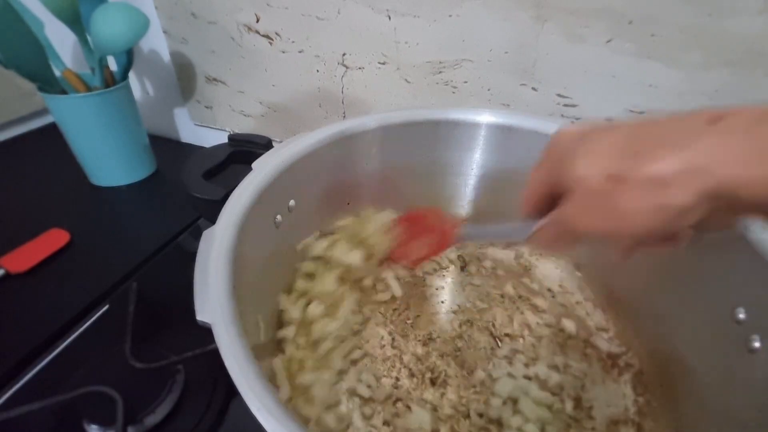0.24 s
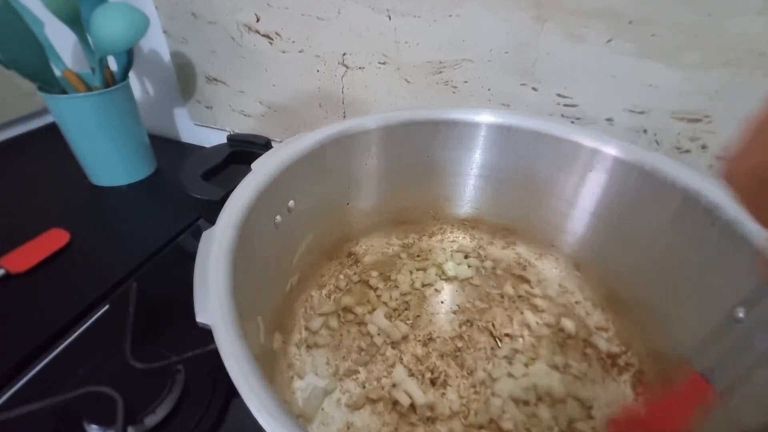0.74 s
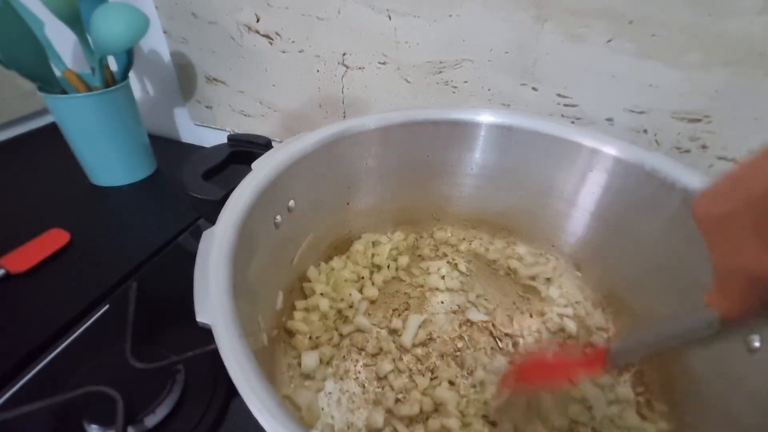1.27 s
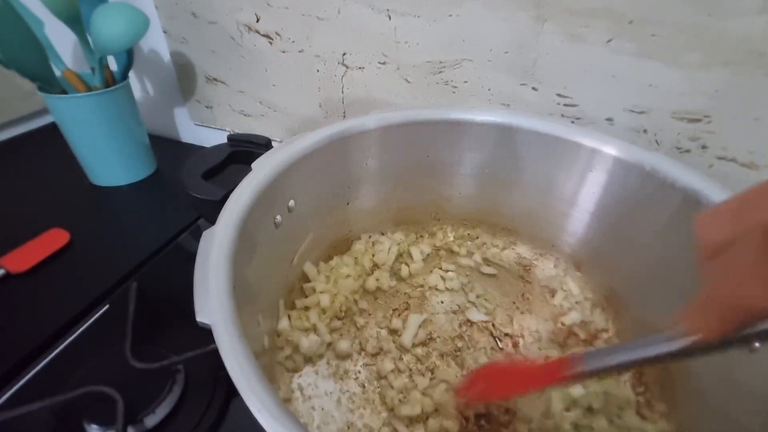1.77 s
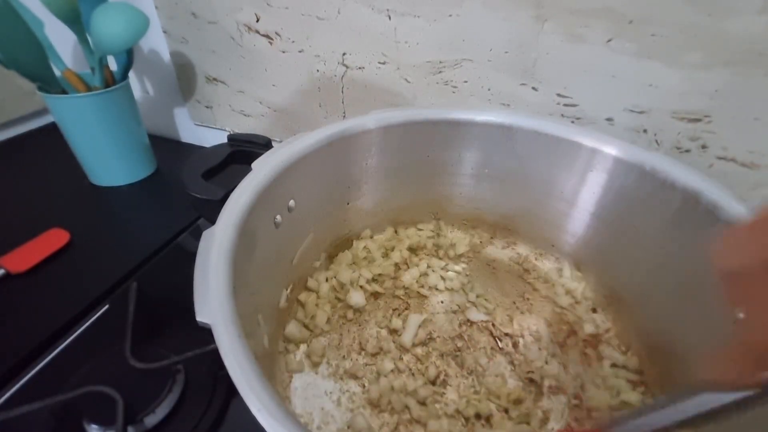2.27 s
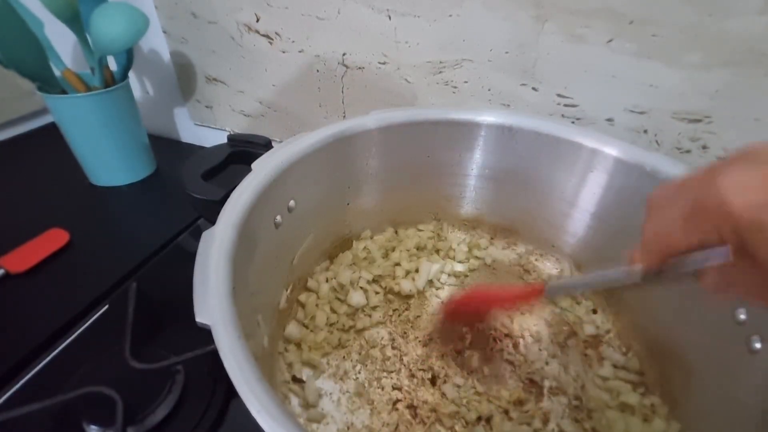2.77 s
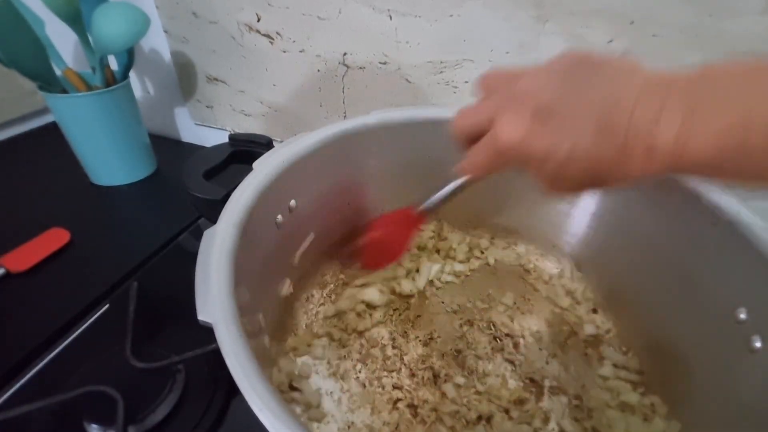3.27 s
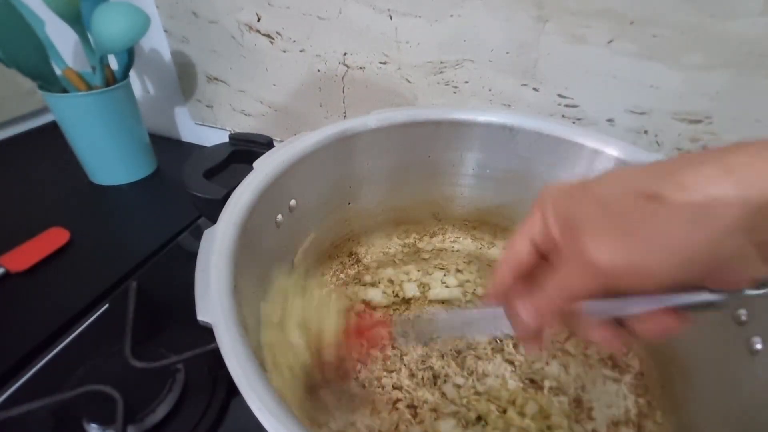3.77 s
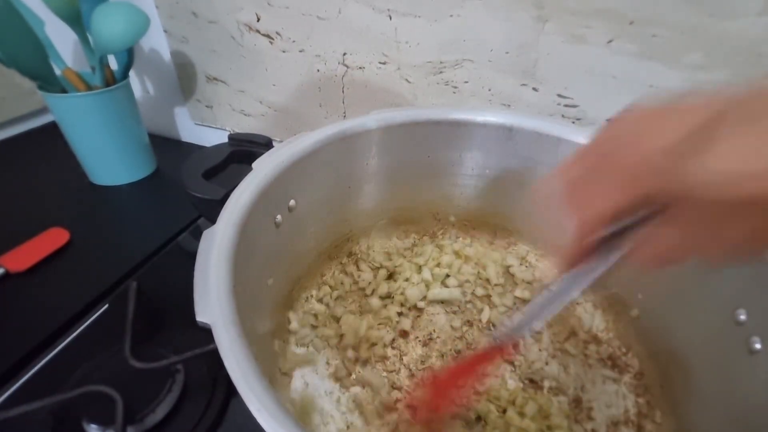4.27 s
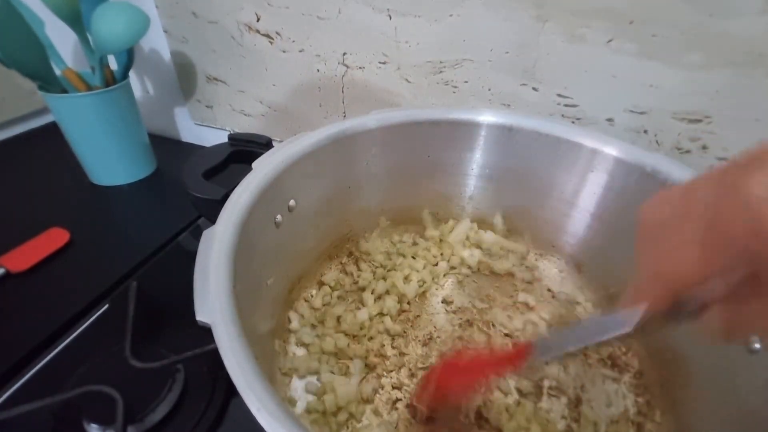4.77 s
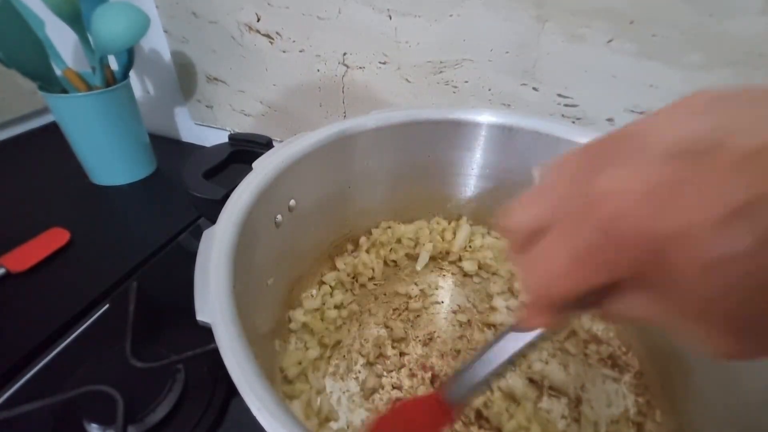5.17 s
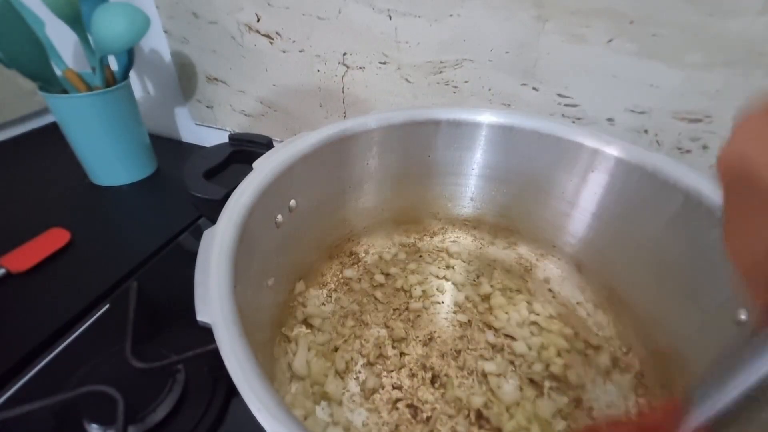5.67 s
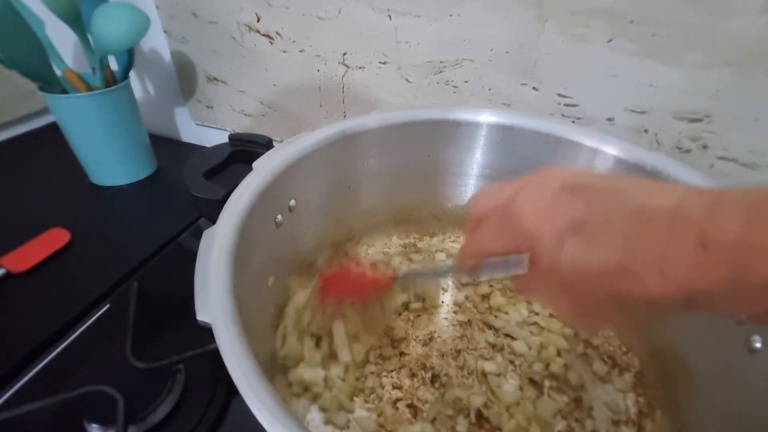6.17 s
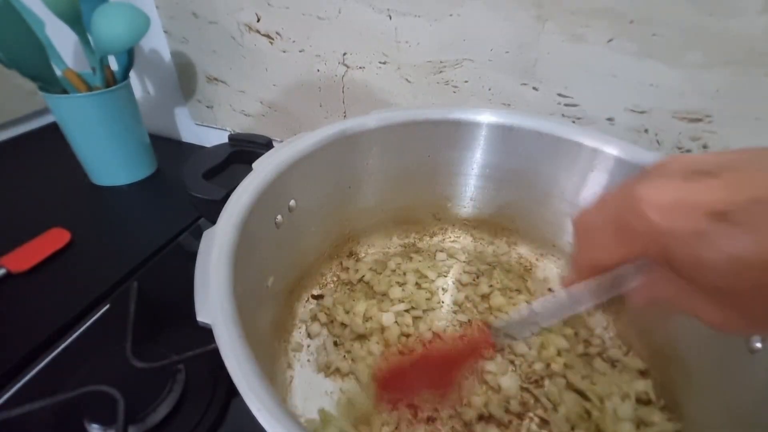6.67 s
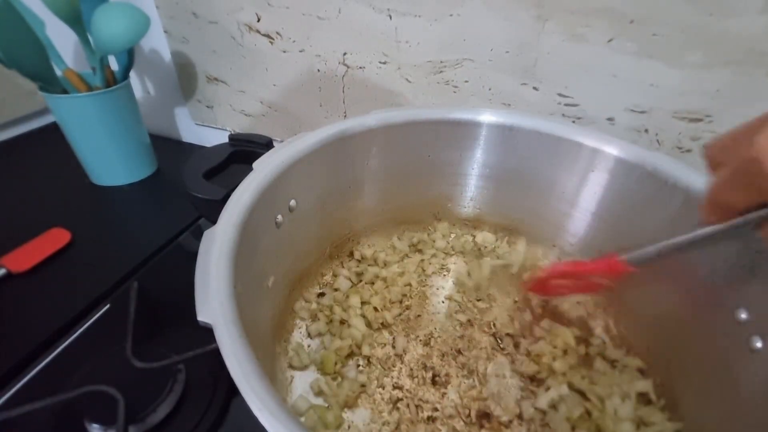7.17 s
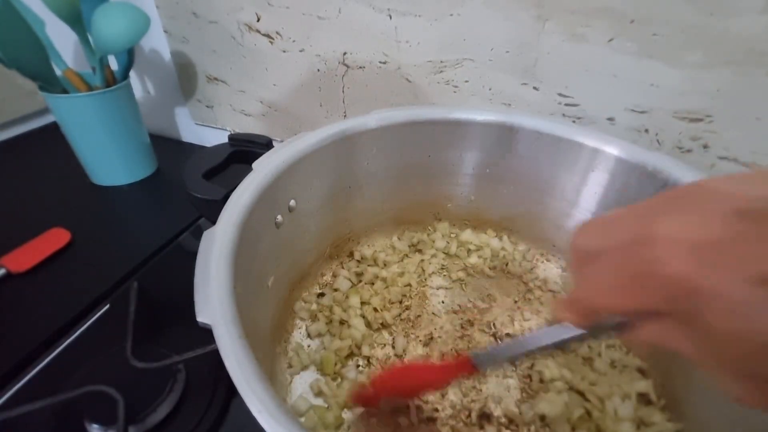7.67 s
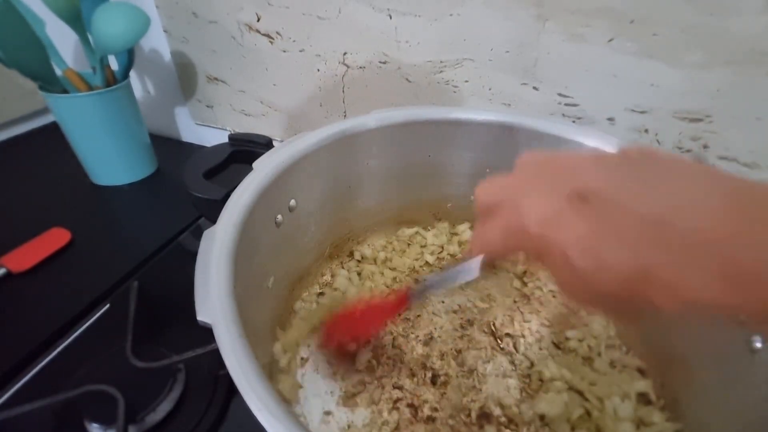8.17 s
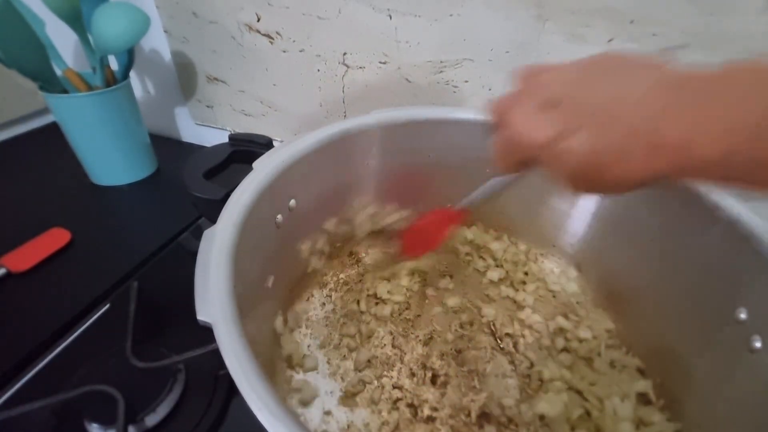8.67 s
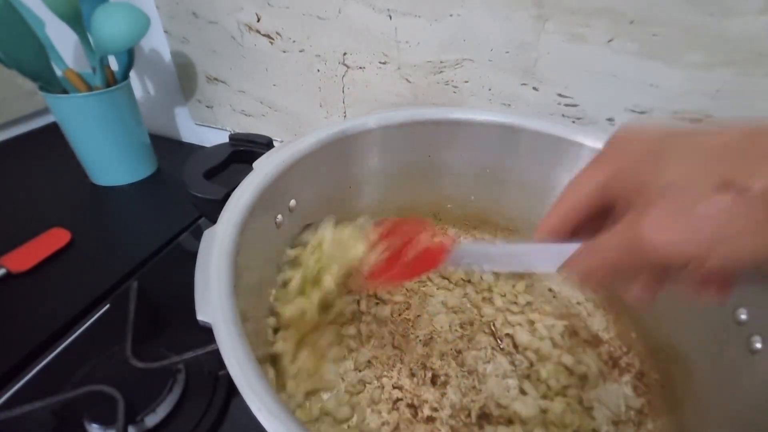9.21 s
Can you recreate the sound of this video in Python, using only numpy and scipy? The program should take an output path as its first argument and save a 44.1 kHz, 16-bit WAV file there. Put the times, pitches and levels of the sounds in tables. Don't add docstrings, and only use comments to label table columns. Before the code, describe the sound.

From the first moment a dense, bright sizzle of onion and garlic in hot oil fills the close stereo view, continuing to the end at about 9.4 s. Quick stirring makes it swell and settle two to five times a second, with a strong flare near 0.35 s. Light scraping starts quietly; soft hollow pushes on the pot bottom gather around 2.4-3.0 s. At about 4.6 s comes the sharpest oil spit, together with a firm low metallic bump and ticks, more bumps following until 4.9 s. Two small wall knocks ring near 5.4 s. A cluster of spits and knocks comes at 6.8 s, then pushes repeat from 7.0 to 8.1 s. Paired spits snap near 8.75 s and a faint one at 9.3 s. Throughout, the pot rocks dully, worktop bumps are faint, and distant low rumble swells softly, strongest around 2.7-3.6 s.

```python
import sys
import numpy as np
from scipy import signal
from scipy.fft import rfft, irfft, next_fast_len
from scipy.io import wavfile
from scipy.ndimage import uniform_filter1d, map_coordinates

SR = 44100
rng = np.random.default_rng(int(sys.argv[2]) if len(sys.argv) > 2 else 0)


def int16_out(signal):
    q = np.round(np.clip(np.atleast_2d(signal).T, -1, 1) * 32767)
    wavfile.write(sys.argv[1], SR, q.astype(np.int16))


def voltage_ratio(decibels):
    exponent = np.asarray(decibels, float) / 20
    return 10 ** exponent


N = 416304

# peak in seconds, fizz in dB, big bubbles in dB,
# seconds to fade 6 dB.
STROKES = [(0.0, -31.0, -40.5, 0.08), (0.13, -28.0, -41.5, 0.05), (0.35, -22.5, -39.0, 0.19),
           (0.57, -34.5, -41.5, 0.06), (0.74, -31.5, -47.0, 0.5), (0.93, -35.5, -49.0, 0.5),
           (1.17, -26.5, -44.0, 0.21), (1.35, -32.0, -44.5, 0.05), (1.51, -32.0, -49.0, 0.5),
           (1.69, -27.5, -46.0, 0.24), (2.01, -30.0, -44.0, 0.39), (2.16, -25.5, -48.5, 0.09),
           (2.27, -29.0, -44.5, 0.3), (2.49, -28.5, -46.5, 0.13), (2.62, -29.0, -46.0, 0.5),
           (2.9, -29.5, -60.0, 0.11), (3.11, -30.5, -53.5, 0.32), (3.38, -25.0, -39.5, 0.18),
           (3.59, -29.0, -39.0, 0.12), (3.78, -31.0, -52.5, 0.5), (4.05, -25.0, -40.0, 0.31),
           (4.33, -29.5, -60.0, 0.43), (4.54, -33.5, -42.5, 0.5), (4.71, -27.0, -45.5, 0.19),
           (5.02, -27.5, -42.0, 0.16), (5.13, -27.5, -45.5, 0.49), (5.47, -27.5, -38.5, 0.18),
           (5.74, -36.5, -47.0, 0.16), (6.04, -28.5, -43.0, 0.26), (6.23, -31.5, -41.5, 0.1),
           (6.38, -31.5, -50.0, 0.5), (6.83, -27.0, -41.5, 0.43), (7.16, -31.5, -48.0, 0.12),
           (7.28, -28.5, -46.5, 0.07), (7.43, -32.0, -44.0, 0.05), (7.52, -28.5, -45.5, 0.24),
           (7.88, -26.5, -42.5, 0.16), (8.08, -30.0, -52.0, 0.23), (8.29, -28.0, -43.5, 0.19),
           (8.48, -29.0, -47.5, 0.5), (8.75, -26.5, -40.5, 0.16), (8.97, -34.0, -42.5, 0.15),
           (9.35, -27.5, -44.0, 0.5)]


def stirring():
    rest_fizz_db, rest_medium_db, rest_big_db = -33.4, -39.2, -45
    flare_s, shape = .111, 1.7
    fizz_rows = [(s, db, flare_s, fade_s) for s, db, _, fade_s in STROKES]
    big_rows = [(s, db, flare_s, fade_s) for s, _, db, fade_s in STROKES]
    fizz_db = surges(fizz_rows, rest_fizz_db, shape)
    big_db = surges(big_rows, rest_big_db, shape)
    medium_db = rest_medium_db + .78 * (fizz_db - rest_fizz_db) + .3 * (big_db - rest_big_db)
    return fizz_db, medium_db, big_db


# frequency in Hz, level in dB per Hz.
BURST_COLOUR = [
    [(700, -33), (1100, -24), (1320, -12.5), (1700, -12.5), (2500, -10.5), (3200, -8), (5300, -3), (6200, -0.5), (7300, 1), (8300, -1.5), (9200, -8), (11000, -2), (12300, -1), (17500, -4)],
    [(700, -35), (1100, -27), (1320, -12.5), (2000, -10), (3200, -6), (5300, 1), (6200, 1.5), (7700, 9.5), (8700, 3), (10700, 3.4), (11800, -1), (13200, 6.9), (17500, 1.5)],
]
# time in seconds, left-right level in dB.
HEAP_PAN = [(0.0, -5.5), (0.31, -8.5), (0.5, -6.0), (1.1, -6.5), (1.52, -3.5), (1.6, -5.5), (2.87, -4.5),
            (3.05, -2.5), (3.29, -5.5), (3.6, -3.5), (4.05, -7.0), (4.57, -3.5), (6.15, -6.5), (8.04, -4.0),
            (8.23, -5.5), (9.44, -6.0)]


def frying():
    fizz_db, medium_db, big_db = stirring()
    pan_db = curves(HEAP_PAN)[0]
    low_hz, high_hz = 3200, 6500
    oil = bursts(30000, 1.3, life_s=.0008) + voltage_ratio(-13) * bursts(250, 1.5, life_s=.0001)
    oil = alike(patchy(oil, depth_db=1.14))
    smother_db = -4 * np.exp(-((np.arange(N) / SR - 1.537) / .012) ** 2)
    oil = oil * voltage_ratio(0.35 * wobble(18) + smother_db)

    def colour(hz):
        return voltage_ratio([along(port, hz) for port in BURST_COLOUR])

    def under(hz, edge_hz):
        return 1 / (1 + (hz / edge_hz) ** 6)

    small = unit(filtered(oil, lambda hz: colour(hz) * (1 - under(hz, high_hz))))
    medium = unit(filtered(oil, lambda hz: colour(hz) * (under(hz, high_hz) - under(hz, low_hz))))
    big = unit(filtered(oil, lambda hz: colour(hz) * under(hz, low_hz)))
    fine = signal.filtfilt(*signal.butter(N=3, Wn=9000 / SR * 2, btype="high"), small)
    small = small + (voltage_ratio((.66 - 1) * (fizz_db - fizz_db.mean())) - 1) * fine
    haze = voltage_ratio(fizz_db) * small + voltage_ratio(medium_db) * medium + voltage_ratio(big_db - 3.2) * big
    return voltage_ratio(2.55) * haze * sides(pan_db - pan_db.mean())


# start in seconds, peak in dB.
SPITS = [
    (4.564, -10),
    (6.7694, -18),
    (6.8688, -16),
    (1.5574, -21),
    (7.12, -19),
    (8.742, -15),
    (8.803, -15),
    (3.237, -19),
    (6.8203, -19),
    (9.3062, -20),
]


def spits():
    drops = scuffs([(s, db + 4) for s, db in SPITS], t60_s=.006)
    return filtered(drops, modes([(5000, 5000, 0)]))


# time in seconds, on the bottom in dB, on the wall in dB.
RUB = [(0, -55, -58), (1.0, -57, -56), (1.3, -52, -55), (1.65, -57, -54), (2.3, -55, -55), (2.55, -48, -56),
       (3.15, -57, -61), (3.5, -53, -57), (3.9, -59, -59), (4.2, -52, -58), (4.55, -56, -57),
       (4.95, -47.5, -54), (5.85, -57, -58), (6.55, -56, -60), (7.2, -46, -55), (7.58, -56, -56),
       (8.7, -52, -56), (9.1, -59, -57)]
# frequency in Hz, width in Hz, level in dB.
BOTTOM = [(337, 20, -15), (405, 15, -3.5), (429, 17, -3), (452, 22, -10), (581, 18, -14.5)]
WALL = [(699, 32, -8), (782, 26, -1.5), (870, 65, 0.4), (1013, 17, -3)]
RIM = [(219, 17.6, -2), (1299, 28, 3.5), (1463, 30, -13), (1782, 40, 1), (2177, 45, -6), (2620, 40, -3.5),
       (3200, 57, -5)]


def rubbing():
    bottom_db, wall_db = curves(RUB)
    bottom = unit(filtered(bursts(900, 2.94, life_s=.008), modes(BOTTOM)))
    wall = unit(filtered(bursts(600, 1.6, life_s=.0026), modes(WALL)))
    rim = unit(filtered(rng.standard_normal((2, N)), modes(RIM)))
    fizz_db = stirring()[0]
    return ports(voltage_ratio(bottom_db + 1.7) * bottom + voltage_ratio(wall_db + 4.2) * wall + voltage_ratio(fizz_db - 24.8) * rim)


# peak in seconds, peak in dB, bottom mode in Hz, seconds from peak to -6 dB.
PUSHES = [(.388, -38, 415, .011), (1.34, -35, 424, .011), (2.455, -29, 413, .022), (2.491, -27, 414, .011),
          (2.657, -31, 425, .017), (2.701, -28, 424, .009), (2.792, -32, 405, .011),
          (2.838, -31, 412, .017), (2.989, -32, 417, .012), (4.281, -36, 422, .011),
          (4.334, -36, 422, .015), (4.624, -22, 410, .012), (4.668, -29, 406, .019),
          (4.803, -28, 414, .012), (4.827, -29, 413, .012), (4.873, -35, 421, .013),
          (6.415, -37, 423, .011), (6.778, -33, 425, .018), (6.815, -34, 414, .019),
          (6.997, -26, 420, .021), (7.176, -25, 417, .024), (7.348, -24, 413, .012),
          (7.486, -33, 427, .011), (7.652, -28, 416, .011), (7.702, -27, 422, .014),
          (7.797, -31, 411, .024), (8.016, -35, 420, .012), (8.051, -32, 419, .014), (8.09, -35, 434, .014),
          (8.746, -36, 412, .011)]
# peak in seconds, peak in dB.
GRAZES = [(.715, -45), (1.07, -42), (1.137, -39), (1.84, -42), (1.95, -42), (2.27, -43), (2.399, -38),
          (2.547, -38), (2.945, -38), (3.3, -40), (3.34, -39), (3.453, -38), (3.564, -39), (3.64, -43),
          (4.775, -36), (5.022, -39), (5.179, -39), (5.41, -39), (5.47, -40), (6.3, -42), (6.6, -43),
          (6.72, -41), (7.058, -38), (7.135, -34), (7.228, -34), (7.29, -37), (7.511, -36), (8.43, -41),
          (8.709, -39), (8.8, -41), (.346, -45), (.536, -44), (.6, -44), (.757, -46), (1.031, -45),
          (1.29, -41), (1.39, -43), (3.054, -41), (3.402, -40), (3.862, -46), (4.72, -41), (4.93, -40),
          (5.06, -40), (5.361, -41), (5.778, -45), (5.9, -45), (6.02, -43), (6.899, -42), (7.41, -39),
          (7.871, -42), (7.95, -42), (8.836, -42), (5.24, -41), (6.46, -44)]
# frequency ratio, level in dB.
NEIGHBOURS = [(1.12, -15.5), (.86, -21)]


def pushes():
    rows = [(s, db, hz, .75 * half_s, half_s) for s, db, hz, half_s in PUSHES]
    rows += [(s, db, 421, .013, .013) for s, db in GRAZES]
    for s, db, hz, half_s in PUSHES:
        for ratio, less_db in NEIGHBOURS:
            rows.append((s - half_s / 2, db + less_db, hz * ratio, .6 * half_s, .7 * half_s))
    return voltage_ratio(.3) * swells(rows) * sides(4.6)[:, None]


# peak in seconds, peak in dB, wall mode in Hz.
KNOCKS = [(1.67, -42, 876), (2.492, -40, 865), (2.694, -41, 876), (2.791, -43, 849), (4.622, -38, 866),
          (4.867, -41, 880), (5.422, -33, 867), (5.469, -31, 883), (6.411, -42, 894), (6.778, -35, 874),
          (6.802, -37, 894), (6.829, -39, 891), (7.012, -39, 869), (7.177, -35, 878), (7.344, -44, 847),
          (.685, -44, 900), (1.225, -43, 867), (1.453, -42, 859), (2.18, -41, 880), (3.396, -43, 860),
          (3.548, -46, 870), (4.735, -43, 859), (4.89, -41, 980), (5.0, -44, 883), (6.03, -43, 853),
          (6.727, -42, 851), (7.13, -42, 894), (7.39, -42, 890), (7.449, -43, 850), (7.49, -42, 816),
          (7.645, -43, 899), (7.844, -41, 805), (8.05, -43, 837), (8.364, -43, 869), (8.91, -42, 918)]


def knocks():
    ring = swells([(s, db - 2.5, hz, .005, .011) for s, db, hz in KNOCKS])
    stir = scuffs([(s - .005, db + 20.8) for s, db, _ in KNOCKS], t60_s=.03, channels=1)
    return (ring + filtered(stir, modes(WALL + RIM))) * sides(-2.5)[:, None]


# frequency in Hz, width in Hz, level in dB.
CONTACT = [(520, 350, 0), (1500, 2200, -9)]


def contacts():
    starts = [(s - half_s, db + 1.2) for s, db, _, half_s in PUSHES]
    starts += [(s - .004, db + 6) for s, db, _ in KNOCKS]
    return ports(filtered(scuffs(starts, t60_s=.07), modes(CONTACT)))


# start in seconds, peak in dB.
TICKS = [(4.563, -28), (4.856, -24), (4.612, -33), (6.774, -28), (6.82, -33), (5.418, -32), (7.162, -32),
         (7.342, -32), (.68, -36), (1.445, -35), (6.58, -36), (2.467, -34)]


def ticks():
    band = signal.butter(N=1, Wn=[450 / SR * 2, 2600 / SR * 2], btype="band")
    return signal.lfilter(*band, scuffs(TICKS, t60_s=.055, channels=1))


# frequency in Hz, width in Hz, level in dB.
HUM = [(340, 34, 0), (455, 30, -7)]


def hum():
    murmur = filtered(bursts(500, 2.5, life_s=.006), lambda hz: modes(HUM)(hz) ** 2)
    return voltage_ratio(-60 + 1.5 * wobble(3)) * ports(unit(murmur))


# start in seconds, peak in dB.
THUDS = [(1.447, -39.5), (2.72, -39), (3.004, -37), (3.219, -54), (3.445, -44), (5.625, -44), (5.836, -37),
         (5.931, -39), (6.071, -42), (6.196, -40), (6.578, -38), (7.337, -40), (7.609, -44), (7.871, -49),
         (8.025, -50), (8.389, -44), (8.797, -41), (8.95, -40), (9.134, -47), (9.379, -41)]


def thuds():
    impulses = np.zeros(N)
    for s, db in THUDS:
        impulses[round(s * SR)] = voltage_ratio(db + 36)
    return filtered(impulses, modes([(201, 71, 7), (345, 50, 1.5)]))


# peak in seconds, peak in dB, frequency in Hz.
THUMPS = [(0.299, -44, 88.8), (0.419, -44, 88.8), (0.509, -44, 91.5), (0.652, -44, 88.8), (0.997, -48, 105),
          (1.465, -45, 88.8), (2.079, -43, 88.8), (2.124, -44, 88.8), (2.723, -44, 88.8),
          (3.028, -49, 88.8), (3.089, -44, 88.8), (3.166, -50, 88.8), (3.327, -51, 88.8), (3.829, -46, 121),
          (4.271, -46, 88.8), (5.43, -50, 88.8), (5.919, -44, 96.9), (6.691, -46, 118), (6.873, -46, 88.8),
          (7.263, -47, 96.9), (7.613, -44, 124), (7.696, -47, 88.8), (8.314, -48, 88.8), (8.408, -49, 88.8),
          (8.542, -46, 88.8), (8.691, -49, 110), (8.959, -52, 91.5)]


def worktop():
    rise_s, fall_s = .022, .03
    return swells([(s, db - 4, hz * rng.uniform(1, 1.25), rise_s, fall_s) for s, db, hz in THUMPS])


# peak in seconds, level in dB, seconds to -6 dB.
LOWEST = [(1.17, -39.5, 0.13), (1.53, -42.0, 0.16), (1.98, -40.0, 0.26), (2.38, -47.0, 0.13),
          (2.7, -35.5, 0.16), (3.1, -43.0, 0.09), (3.37, -35.5, 0.14), (3.64, -38.0, 0.17),
          (4.13, -41.0, 0.19), (4.53, -43.5, 0.08), (4.72, -50.5, 0.07), (5.45, -56.5, 0.11),
          (8.59, -44.0, 0.16), (8.91, -43.0, 0.17), (9.3, -46.0, 0.12)]
SECOND = [(0.25, -44.5, 0.12), (0.7, -42.5, 0.05), (0.99, -45.0, 0.14), (1.22, -54.5, 0.09),
          (1.88, -54.0, 0.4), (2.53, -44.0, 0.05), (2.7, -43.5, 0.12), (2.98, -39.5, 0.07),
          (3.23, -42.0, 0.05), (3.37, -44.5, 0.28), (3.92, -38.0, 0.06), (4.36, -43.5, 0.05),
          (4.5, -38.5, 0.05), (4.76, -41.5, 0.19), (5.37, -46.5, 0.13), (5.58, -47.5, 0.15),
          (6.01, -42.5, 0.09), (6.44, -42.0, 0.09), (6.81, -44.0, 0.07), (7.17, -47.0, 0.15),
          (7.49, -43.0, 0.05), (8.06, -48.5, 0.4), (8.62, -51.0, 0.11), (9.2, -45.5, 0.21)]
THIRD = [(0.03, -51.0, 0.4), (0.49, -49.5, 0.18), (0.97, -54.5, 0.32), (1.47, -53.0, 0.1),
         (2.13, -47.0, 0.07), (2.41, -47.5, 0.04), (2.86, -47.5, 0.04), (3.13, -45.5, 0.13),
         (3.43, -52.0, 0.09), (3.85, -48.0, 0.12), (4.09, -51.5, 0.05), (4.27, -47.5, 0.04),
         (4.6, -47.5, 0.16), (4.92, -44.5, 0.1), (5.26, -48.5, 0.13), (5.49, -47.5, 0.05),
         (5.8, -50.0, 0.2), (6.22, -50.0, 0.09), (6.58, -48.0, 0.15), (6.96, -50.5, 0.15),
         (7.21, -44.5, 0.08), (7.62, -57.5, 0.28), (8.55, -56.0, 0.25), (9.05, -48.0, 0.05)]
# frequency in Hz, width in Hz, level in dB.
UPPER = [(76.5, 10.6, 3), (97, 15, -8.5)]


def rumble():
    booms = 0
    for rows, rest_db, hz in ((LOWEST, -62, 45), (SECOND, -56, 59.8)):
        level_db = surges([(s, db, half_s, half_s) for s, db, half_s in rows], rest_db)
        turns = np.cumsum(hz + 0.74 * wobble(2.5)) / SR
        booms = booms + np.sqrt(2) * voltage_ratio(level_db + 0.2) * np.sin(2 * np.pi * turns)
    third_db = surges([(s, db, half_s, half_s) for s, db, half_s in THIRD], -60)
    upper = unit(filtered(rng.standard_normal((2, N)), lambda hz: modes(UPPER)(hz) ** 2))
    return booms * sides(5.0)[:, None] + ports(voltage_ratio(third_db - 1.6) * upper)


# frequency in Hz, level in dB per Hz.
AIR = [(20, -14), (40, -13), (55, -3), (100, -4.5), (150, -12.5), (280, -15), (540, -15), (730, -16),
       (1100, -16), (2000, -31)]
# time in seconds, level in dB.
DRAUGHT = [(0, 2.5), (1.8, 2), (2.4, -1), (8, -1), (9.44, 0)]


def air():
    murmur = unit(filtered(rng.standard_normal((2, N)), lambda hz: voltage_ratio(along(AIR, hz))))
    middle = signal.lfilter(*signal.butter(N=1, Wn=450 / SR * 2, btype="high"), murmur)
    wall_db = curves(RUB)[1]
    murmur = murmur + (voltage_ratio(.7 * (wall_db - wall_db.mean())) - 1) * middle
    return ports(voltage_ratio(-49.8 - 1.5 + curves(DRAUGHT)[0]) * murmur)


def bursts(per_second, spread_db, life_s):
    chance = rng.random((2, N))
    sizes = voltage_ratio(-spread_db * np.log(.02 + .98 * chance[1]))
    hits = (chance[0] < per_second / SR) * sizes
    power = signal.lfilter([1], [1, -np.exp(-1 / (life_s * SR))], hits ** 2)
    return unit(np.sqrt(power) * rng.standard_normal((2, N)))


def patchy(x, depth_db):
    z = signal.stft(x, nperseg=512)[2]
    field = uniform_filter1d(rng.standard_normal(z.shape[1:]), 8, 0)
    field = uniform_filter1d(field, 10, 1)
    return signal.istft(z * voltage_ratio(depth_db * unit(field)), nperseg=512)[1][:, :N]


def scuffs(rows, t60_s, channels=2):
    out, t = np.zeros((channels, N + SR)), np.arange(SR // 20) / SR
    for s, db in rows:
        noise = rng.standard_normal((channels, len(t)))
        out[:, round(s * SR):][:, :len(t)] += voltage_ratio(db - 60 * t / t60_s) * noise
    return out[:, :N]


def swells(rows):
    reach = SR // 10
    out, t = np.zeros(N + SR), np.arange(-reach, reach) / SR
    for s, db, hz, rise_s, fall_s in rows:
        bell_db = db - 6 * np.abs(t / np.where(t < 0, rise_s, fall_s)) ** 1.6
        out[round(s * SR) - reach:][:len(t)] += voltage_ratio(bell_db) * np.sin(2 * np.pi * hz * t)
    return out[:N]


def surges(rows, rest_db, shape=2):
    t = np.arange(0, N / SR + .01, .004)
    power = voltage_ratio(2 * rest_db)
    for s, db, rise_s, fall_s in rows:
        distance = np.abs((t - s) / np.where(t < s, rise_s, fall_s))
        power = power + voltage_ratio(2 * db - 12 * distance ** shape)
    return np.interp(np.arange(N) / SR, t, 10 * np.log10(power))


def modes(table):
    def response(f):
        total = 0
        for k, (hz, width, db) in enumerate(table):
            total = total + (-1) ** k * voltage_ratio(db) * 1j * f * width / (hz * hz - f * f + 1j * f * width)
        return total
    return response


def filtered(x, response):
    m = next_fast_len(N + SR // 2, True)
    return irfft(rfft(x, m) * response(np.fft.rfftfreq(m, 1 / SR)), m)[..., :N]


def unit(x):
    return x / np.sqrt(np.mean(x ** 2) + 1e-20)


def along(points, hz):
    f, v = np.transpose(points)
    return np.interp(np.log(hz + 1), np.log(f + 1), v)


def curves(rows):
    s, *cols = np.transpose(rows)
    return [np.interp(np.arange(N) / SR, s, c) for c in cols]


def wobble(rate_hz):
    knots = rng.standard_normal(int(N * rate_hz / SR) + 4)
    return map_coordinates(knots, [np.arange(N) * rate_hz / SR])


def sides(pan_db):
    return voltage_ratio(np.array([pan_db / 2, -pan_db / 2]))


# frequency in Hz, left-right correlation.
ALIKE = [(60, 0.78), (170, 0.5), (330, 0.99), (700, 0.53), (850, 0.32), (1200, 0.41), (1600, 0.23),
         (1780, -0.25), (2050, 0.15), (2350, -0.27), (3300, -0.064), (4200, -0.025), (7200, 0.00099),
         (15000, 0.06)]


def alike(pair):
    def mix(hz):
        angle = np.arccos(np.clip(along(ALIKE, hz), -1, 1)) / 2
        return np.array([np.cos(angle), np.sin(angle)])
    mid, side = filtered(pair, mix)
    return np.array([mid + side, mid - side])


# frequency in Hz, left-right level in dB.
SHADOW = [(60, 1), (110, 2.5), (200, -2.5), (400, 4.5), (700, -2.5), (880, -1.5), (1100, 0), (1300, 6),
          (1800, -3), (2600, 8)]


def ports(pair):
    return filtered(alike(pair), lambda hz: sides(along(SHADOW, hz)))


def scene():
    oil = frying() + spits()
    metal = rubbing() + pushes() + knocks() + contacts() + ticks() + hum() + thuds() + worktop()
    left, right = metal
    lead_s = .00018
    metal = np.array([left, np.roll(right, round(lead_s * SR))])
    return oil + metal + rumble() + air()


def top_cut(x):
    return signal.sosfilt(signal.butter(12, 16420, fs=SR, output="sos"), x)


def record(dry):
    def lift(hz):
        return voltage_ratio(along([(13500, 0), (15700, 3)], hz)) * (hz < 15790)
    return top_cut(filtered(dry, lift))


dry = scene()
out = record(dry)
int16_out(out)
```